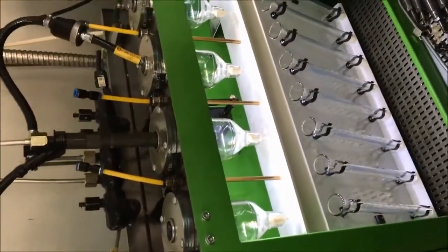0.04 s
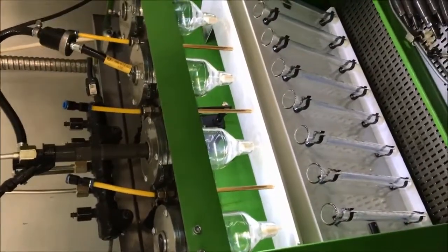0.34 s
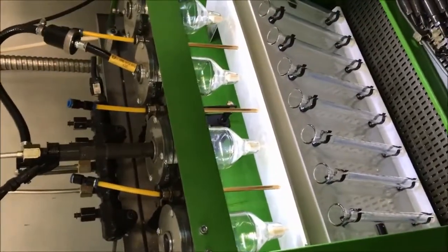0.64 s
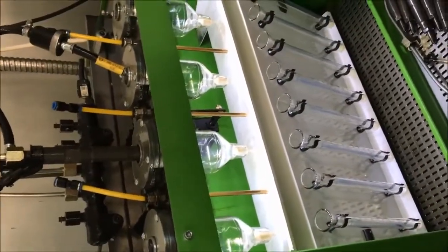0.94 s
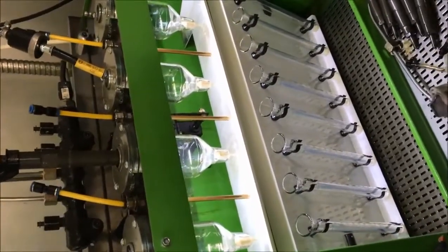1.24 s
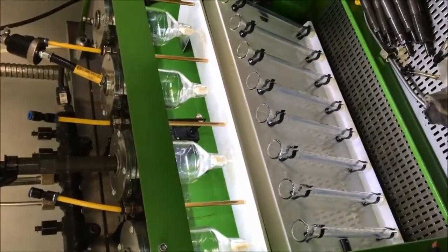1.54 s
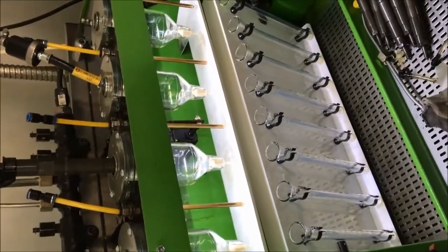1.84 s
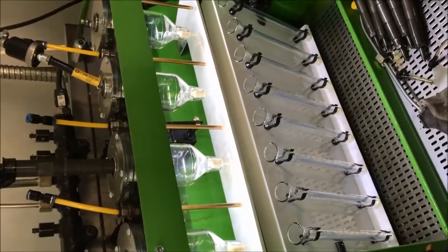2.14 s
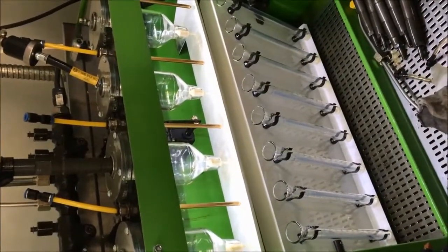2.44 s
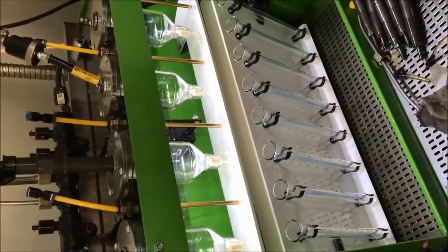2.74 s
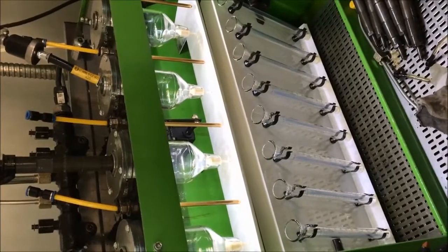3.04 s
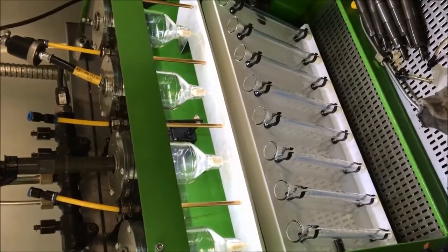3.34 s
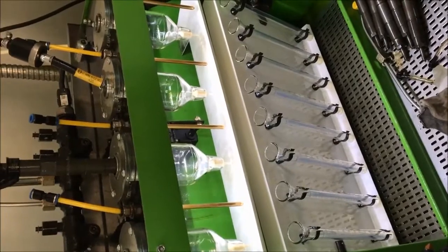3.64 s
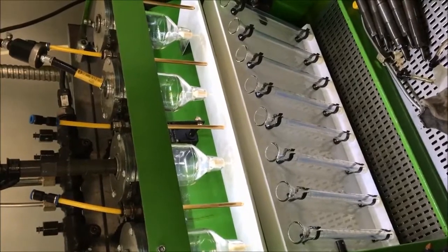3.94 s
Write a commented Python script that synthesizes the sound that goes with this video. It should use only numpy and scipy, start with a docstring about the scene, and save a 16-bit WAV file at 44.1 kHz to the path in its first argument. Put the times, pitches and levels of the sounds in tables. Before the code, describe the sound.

A diesel injector starts ticking rapidly over a humming, whining test bench pump.

```python
"""At a diesel injector test bench, one microphone close above it. A motor turns a high-pressure
pump that hums and clatters with the shaft; fuel and cooling air rush, and the drive whines.
Then an injector starts firing at a fixed rate: valve and needle strike and bounce, so each shot
is a rattling metal tick, followed by a clack and a short hollow note from the pipe and glass
that catch the spray."""
import sys
import numpy as np
from scipy import signal
from scipy.fft import rfft, irfft
from scipy.io import wavfile

SR = 44100
rng = np.random.default_rng(int(sys.argv[2]) if len(sys.argv) > 2 else 0)


def inscribe(sig):
    """Save sig as 16-bit PCM at rate SR to the path in sys.argv[1].

    A 1-D sig is mono; a 2-D sig holds one channel per row.
    Samples are clipped to [-1, 1] before scaling.
    """
    pcm = np.round(np.clip(np.atleast_2d(sig).T, -1, 1) * 32767)
    wavfile.write(sys.argv[1], SR, pcm.astype(np.int16))


N = 176400
TIME = np.arange(N) / SR
SHAFT_HZ = 20.135
FIRST_SHOT_S, SHOT_EVERY_S = 1.6487, 0.06


def injector():
    """Evenly timed shots of slightly uneven strength, each sounding the metal, pipe and glass."""
    starts = np.arange(FIRST_SHOT_S, N / SR, SHOT_EVERY_S)
    shots = np.zeros(N)
    shots[np.round(starts * SR).astype(int)] = from_db(0.6 * rng.standard_normal(len(starts)))
    firing_s = np.maximum(TIME - FIRST_SHOT_S, 0)
    return metal_tick(shots) + spray_clack(shots, firing_s) + hollow_notes(shots, firing_s)


def metal_tick(shots):
    """Valve and needle strike and bounce: every contact snaps, then the metal rings on."""
    # contacts in one shot: (time after the shot [s], level [dB])
    contacts = [(.0002, 1), (.001, -4.5), (.0029, -3), (.0042, -11), (.0053, 0.5), (.008, -8),
                (.0094, -12.5), (0.0111, -2), (0.0124, -12.5), (.0148, -5)]
    # modes of the injector body: (frequency [Hz], mean level [dB], t60 [s])
    body_modes = [(4335, -48.5, 0.088), (4860, -52, 0.011), (5920, -44, 0.0037), (6955, -46, 0.042),
                  (7070, -41, 0.018), (7370, -35, .009), (13700, -51, .004), (13870, -44, .005)]
    # spectrum of a snap: (frequency [Hz], relative density [dB])
    snap_spectrum = [(1500, -10), (3000, -3), (5000, -7), (7400, -2), (8600, -9), (11500, -11.5),
                     (13300, 3.5), (15800, -6.5)]
    # dense ring of the metal around the injector: (frequency [Hz], relative density [dB])
    metal_spectrum = [(2200, -5.5), (3600, -15), (4400, -11), (5000, -6), (5600, -11), (6500, -8),
                      (7000, 7.5), (7420, 2.5), (7800, -6), (8600, -10), (11500, -17.5), (13300, -10),
                      (14800, -18), (15800, -10)]
    strikes = np.zeros(int(SHOT_EVERY_S * SR))
    for delay, db in contacts:
        strikes[int(delay * SR)] += from_db(db)
    body = sum((-1) ** k * from_db(db) * rms_one(ring(strikes, hz, t60))
               for k, (hz, db, t60) in enumerate(body_modes))
    snap_shape = sum(from_db(db - 29.5) * envelope(attack=1 / SR, hold=0, t60=0.0061, delay=delay)
                     for delay, db in contacts)
    metal_shape = from_db(-28) * envelope(attack=0.0014, hold=0.0058, t60=0.11)
    snaps = dense_ring(snap_spectrum, fresh=0.18) * each_shot(shots, snap_shape)
    metal = dense_ring(metal_spectrum, fresh=0.18) * each_shot(shots, metal_shape)
    return each_shot(shots, body) + snaps + metal


def spray_clack(shots, firing_s):
    """The spray hits the pipe with a clack that grows louder as the firing goes on."""
    # clack in the pipe: (frequency [Hz], relative density [dB])
    spectrum = [(250, -13), (420, 9), (800, 3.5), (1100, -20), (1370, -11), (1600, -4.5), (1900, -4.5),
                (2600, -21), (4000, -25)]
    rise_db_per_s = 2.5
    shape = envelope(attack=0.0029, hold=0.00097, t60=0.13)
    clacks = dense_ring(spectrum, fresh=0.26) * each_shot(shots, shape)
    return from_db(-34.5 + rise_db_per_s * firing_s) * clacks


def hollow_notes(shots, firing_s):
    """Pipe and glass answer each shot with tones that swell, slide up to pitch and die."""
    # their tones: (frequency [Hz], level [dB], delay [s], attack [s], hold [s], t60 [s])
    tones = [(522.7, -18, 0.0067, .011, 0.018, 0.059), (202.9, -30.5, 0.018, 0.0083, 0.023, 0.15),
             (346.8, -27.5, 0.0199, 0.0066, 0.0027, 0.026), (1379, -34.5, 0.0048, 0.0028, 0.00067, 0.1),
             (1550, -31.5, 0.0022, 0.0055, 0.00037, 0.1), (1733, -28.5, 0.0063, 0.0036, 0.00083, 0.042)]
    flat_share, slide_s = 0.108, 0.0059
    first_extra_db, settle_s = 1.5, 0.036
    sound = 0
    for hz, db, delay, attack, hold, t60 in tones:
        age = np.maximum(TIME[:SR // 4] - delay, 0)
        cycles = np.cumsum(hz * (1 - flat_share * np.exp(-age / slide_s))) / SR
        sound += from_db(db) * envelope(attack, hold, t60, delay) * np.sin(2 * np.pi * cycles)
    accent = from_db(first_extra_db * np.exp(-firing_s / settle_s))
    return each_shot(shots * accent, sound)


def pump(bass_db, rush_db):
    """The pump hums on multiples of the shaft rate; its clatter and rush throb with every turn."""
    # hum: (multiple of the shaft rate, level [dB])
    orders = [(3, -48.5), (4, -43.5), (5, -43.5), (6, -38.5), (7, -40.5), (8, -42), (9, -50.5), (12, -49.5),
              (13, -49), (15, -39), (16, -46), (18, -51.5), (21, -49.5), (22, -50), (32, -46), (33, -47.5),
              (35, -52), (38, -52), (39, -53.5), (40, -51), (42, -52), (43, -54.5), (44, -60), (50, -50),
              (93, -51.5), (95, -52.5)]
    # clatter, alike on every turn: (frequency [Hz], relative density [dB])
    clatter_spectrum = [(40, -10), (120, -18), (220, -20), (330, -14), (520, 1), (650, 1.5), (850, -7.5),
                        (930, -8), (1100, -11.5), (1500, -10), (2150, -19), (2340, -4), (2500, -23.5),
                        (2750, -19.5), (3150, -10.5), (3600, -30), (5000, -16), (8000, -29), (10000, -23),
                        (12500, -20.5)]
    # rush of fuel and cooling air: (frequency [Hz], relative density [dB])
    rush_spectrum = [(20, -11), (45, -4.5), (120, 1), (220, -0.5), (400, -5.5), (780, -6.5), (1100, -11.5),
                     (2100, -9.5), (2340, -6.5), (2600, -12.5), (3200, -21.5), (3800, -16.5), (4900, -24.5),
                     (6200, -17), (7400, -13.5), (8300, -20.5), (9400, -16), (11000, -16.5), (12300, -25.5),
                     (15800, -26)]
    waver_db, bass_below_hz, throb_db = 2.5, 175, 0.68
    hum = 0
    for order, db in orders:
        hz = order * SHAFT_HZ
        level_db = db + waver_db * drift(rate_hz=2.13) + bass_db * (hz < bass_below_hz)
        hum += from_db(level_db) * np.sqrt(2) * np.sin(2 * np.pi * (hz * TIME + rng.random()))
    throb = from_db(throb_db * repeating(1 / SHAFT_HZ, top_hz=258))
    clatter = from_db(-40.5) * colour(throb * repeating(1 / SHAFT_HZ), clatter_spectrum)
    rush = from_db(rush_db - 34) * colour(throb * rng.standard_normal(N), rush_spectrum)
    return hum + clatter + rush


def casing_chatter():
    """Resonances of the pump casing, rubbed in step with the shaft, swell at set points of the turn."""
    # resonances: (frequency [Hz], width [Hz], level [dB], swells per turn, first swell [s], swing [dB])
    resonances = [(1918, 91, -47, 1, 0.04, 5), (2338, 49, -42, 4, 0.0062, 1.5),
                  (2976, 200, -48.5, 1, 0.0067, 8)]
    casing = 0
    for hz, width, db, swells, first_s, swing_db in resonances:
        swell = from_db(swing_db * np.cos(2 * np.pi * swells * SHAFT_HZ * (TIME - first_s)))
        rub = partly_repeating(1 / SHAFT_HZ, fresh=0.53)
        r = np.exp(-np.pi * width / SR)
        tone = signal.lfilter([1, 0, -1], [1, -2 * r * np.cos(2 * np.pi * hz / SR), r * r], rub)
        casing += from_db(db) * rms_one(tone * swell)
    return casing


def drive_whine(main_db, side_db):
    """The drive whines in thin high tones; the pair flanking the main cluster swells separately."""
    # main cluster, faint top tones and flanking pair: (frequency [Hz], level [dB])
    main_tones = [(5922, -51), (6002.5, -51.5), (6083.5, -44), (6164, -56)]
    top_tones = [(13604, -60), (14169, -59), (14336, -58), (14901, -58)]
    side_tones = [(5356, -58), (6648, -46.5)]
    main = wavering_tones(main_tones) + wavering_tones(top_tones)
    return from_db(main_db) * main + from_db(side_db) * wavering_tones(side_tones)


def wavering_tones(tones, wander_hz=2.37):
    """Sines that waver slightly in pitch and by about 1 dB in level."""
    sound = 0
    for hz, db in tones:
        cycles = np.cumsum(hz + wander_hz * drift(rate_hz=2.46)) / SR + rng.random()
        sound += from_db(db + drift(rate_hz=6.4)) * np.sqrt(2) * np.sin(2 * np.pi * cycles)
    return sound


def dense_ring(spectrum, fresh):
    """Countless close modes, heard as coloured noise partly alike from shot to shot."""
    return colour(partly_repeating(SHOT_EVERY_S, fresh), spectrum)


def partly_repeating(period_s, fresh):
    """Flat noise that repeats, except for the share `fresh` of its power."""
    return np.sqrt(1 - fresh) * repeating(period_s) + np.sqrt(fresh) * rng.standard_normal(N)


def repeating(period_s, top_hz=SR / 2):
    """Flat noise up to a top frequency that comes back alike in every period."""
    size = int(round(period_s * SR))
    hz = np.arange(size // 2 + 1) / period_s
    phases = np.exp(2j * np.pi * rng.random(len(hz)))
    cycle = irfft(phases * (hz > 0) * (hz < top_hz), size)
    return rms_one(np.resize(cycle, N))


def colour(noise, spectrum):
    """Give a steady noise a spectrum, at unit power."""
    hz, db = np.transpose(spectrum)
    bin_hz = np.maximum(np.arange(N // 2 + 1) * SR / N, 1)
    gain = from_db(np.interp(np.log(bin_hz), np.log(hz), db))
    return rms_one(irfft(rfft(noise) * gain, N))


def ring(clicks, hz, t60):
    """One mode: each click sets a decaying sine ringing."""
    r, w = from_db(-60 / (t60 * SR)), 2 * np.pi * hz / SR
    return signal.lfilter([0, np.sin(w)], [1, -2 * r * np.cos(w), r * r], clicks + 1e-18)


def envelope(attack, hold, t60, delay=0):
    """Rise, hold and decay of one shot; times in seconds."""
    age = TIME[:SR // 4] - delay
    decay = from_db(-60 * np.maximum(age - attack - hold, 0) / t60)
    return np.clip(age / attack, 0, 1) * decay


def each_shot(shots, sound):
    """Play a short sound or envelope at every shot."""
    return signal.oaconvolve(shots, sound)[:N]


def drift(rate_hz):
    """Slow random wander with a spread of about 1."""
    hop, warm_up = 100, 1000
    r = np.exp(-2 * np.pi * rate_hz * hop / SR)
    noise = rng.standard_normal(N // hop + warm_up + 2)
    slow = signal.lfilter([1], [1, -2 * r, r * r], noise)[warm_up:]
    return np.interp(np.arange(N) / hop, np.arange(len(slow)), rms_one(slow))


def from_db(db):
    """Decibels to gain."""
    return 10 ** (np.asarray(db) / 20)


def rms_one(x):
    """Scale to unit power."""
    return x / np.sqrt(np.mean(x ** 2) + 1e-20)


def scene():
    """The injector over the running pump and drive, in mono from close above the bench."""
    # slow level shifts: (time [s], bass hum [dB], rush [dB], main whine [dB], flanking whine [dB])
    levels = [(0, -1, 0, -0.5, -5), (.45, -1.5, -0.5, 4, 0), (.8, -3.5, -0.7, 2.5, -5),
              (1.08, -3.5, -1, 3, -0.5), (1.45, -0.5, 0, 0, 2), (2.1, -8.5, -0.5, -1, 2.5),
              (3, -5, 0, -2.5, -2.5), (4, -7, -1, -0.5, 3.5)]
    times, *columns = np.transpose(levels)
    bass_db, rush_db, main_db, side_db = [np.interp(TIME, times, column) for column in columns]
    bench = pump(bass_db, rush_db) + casing_chatter() + drive_whine(main_db, side_db)
    return (injector() + bench)[None]


def record(dry):
    """The top of the treble is cut steeply."""
    cutoff_hz = 15750
    return signal.sosfilt(signal.ellip(10, .1, 80, cutoff_hz, fs=SR, output="sos"), dry)


dry = scene()
out = record(dry)
inscribe(out)
```